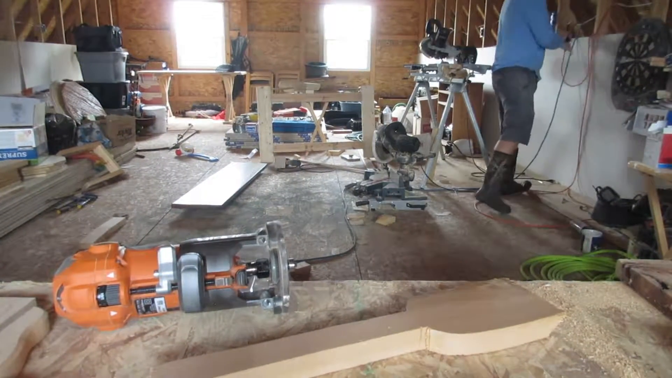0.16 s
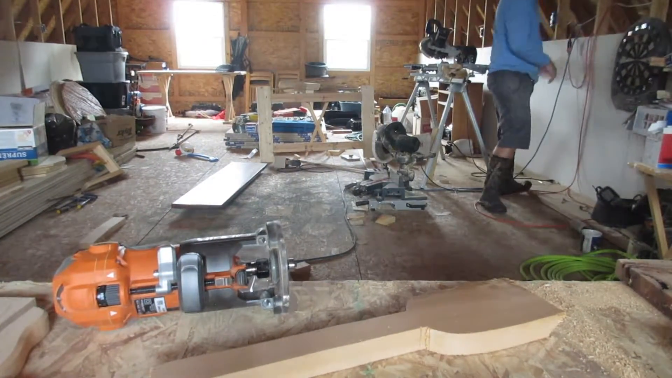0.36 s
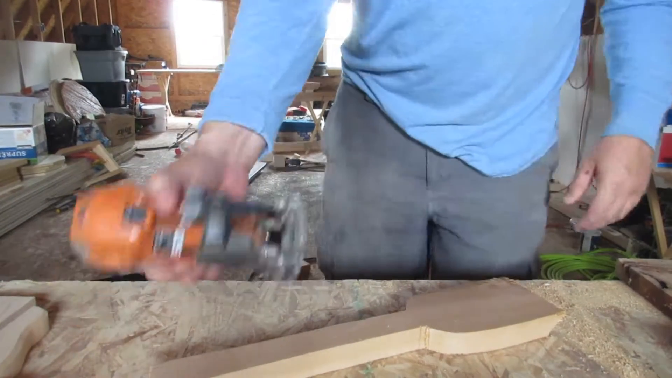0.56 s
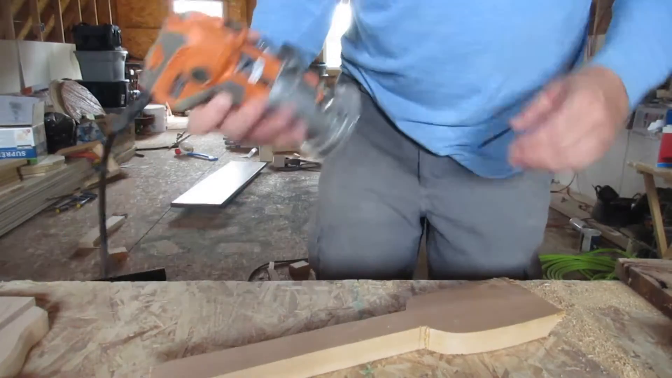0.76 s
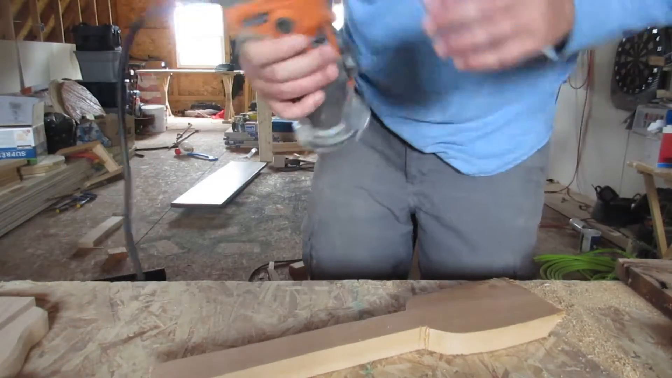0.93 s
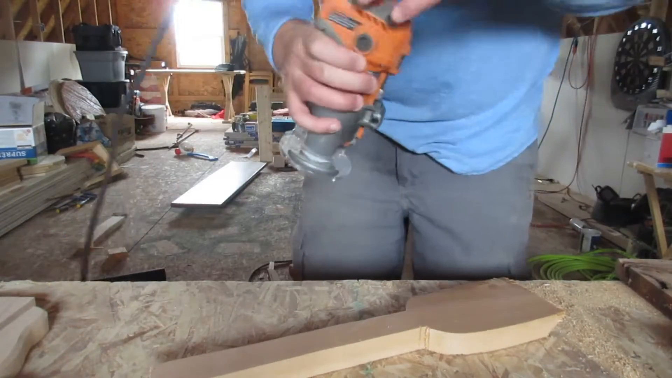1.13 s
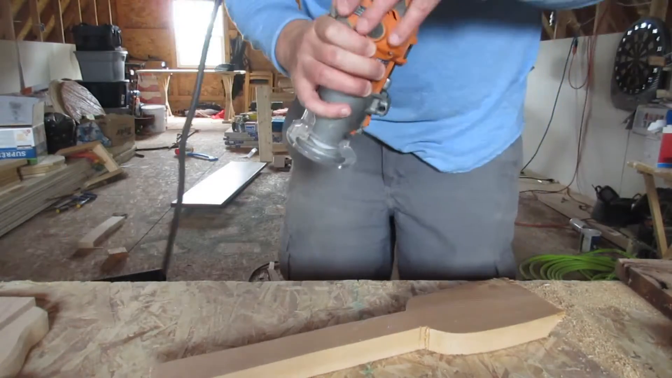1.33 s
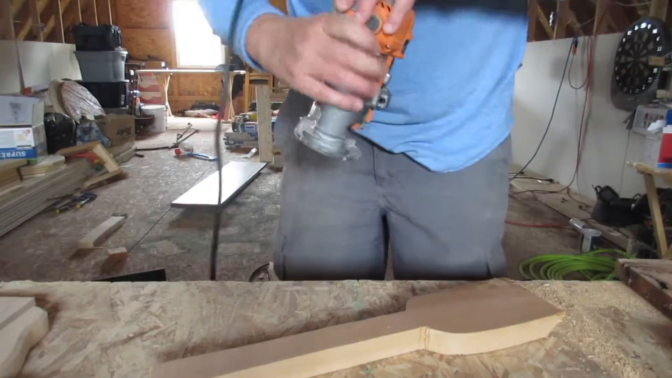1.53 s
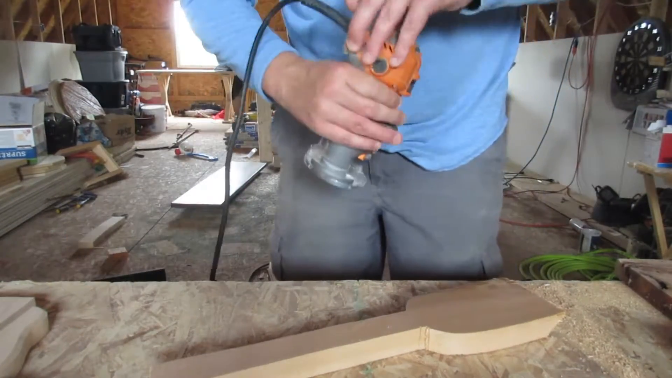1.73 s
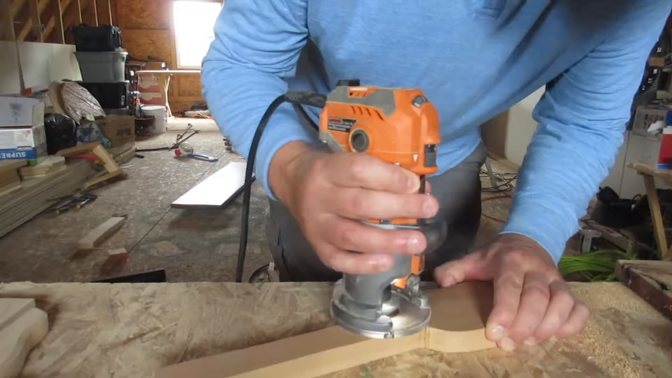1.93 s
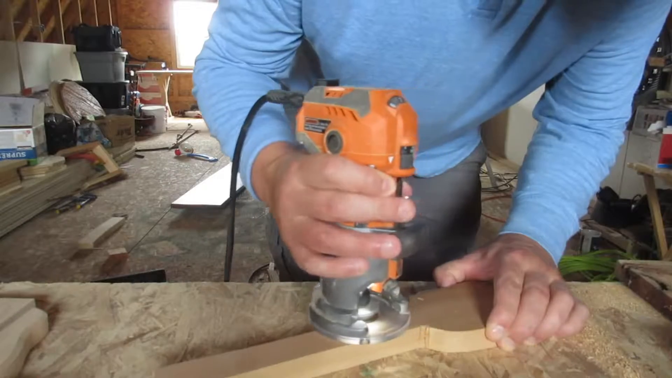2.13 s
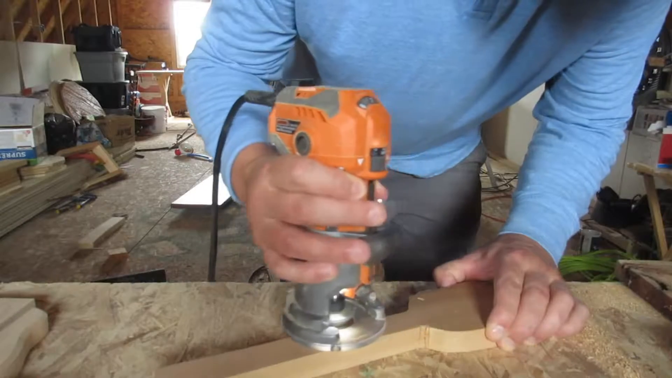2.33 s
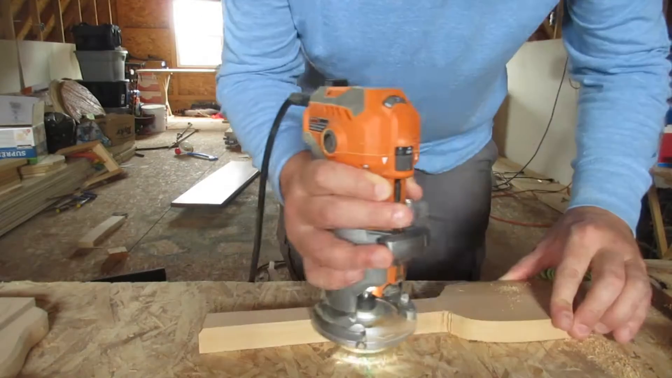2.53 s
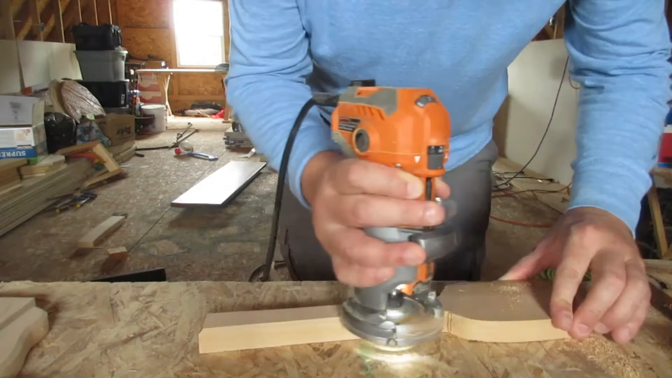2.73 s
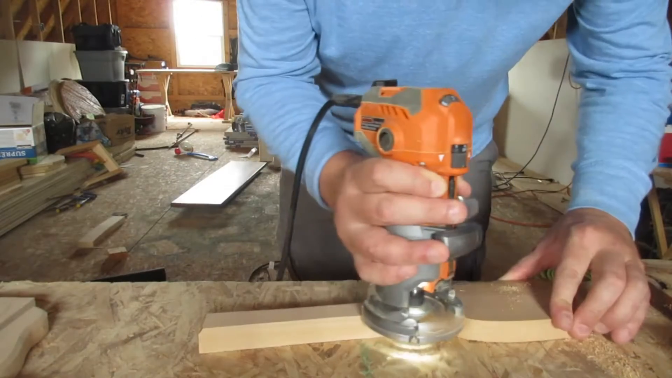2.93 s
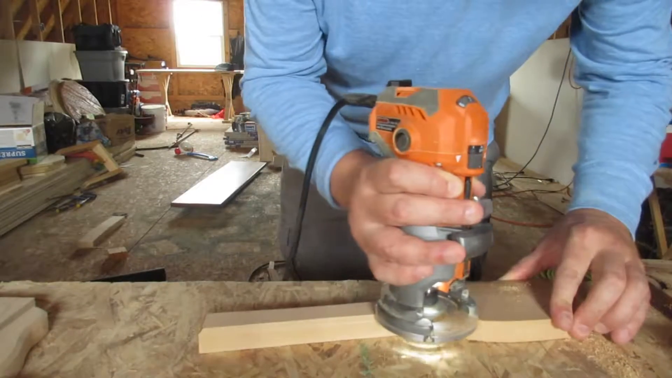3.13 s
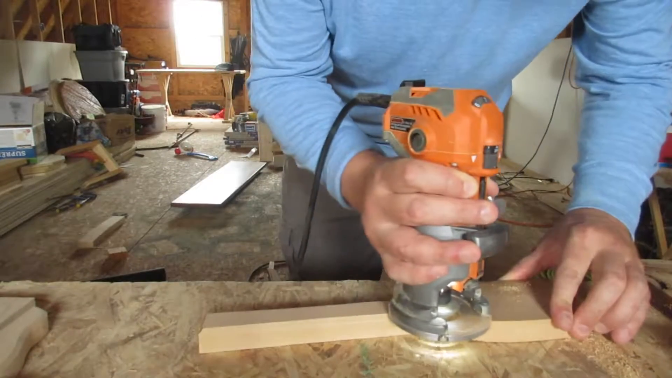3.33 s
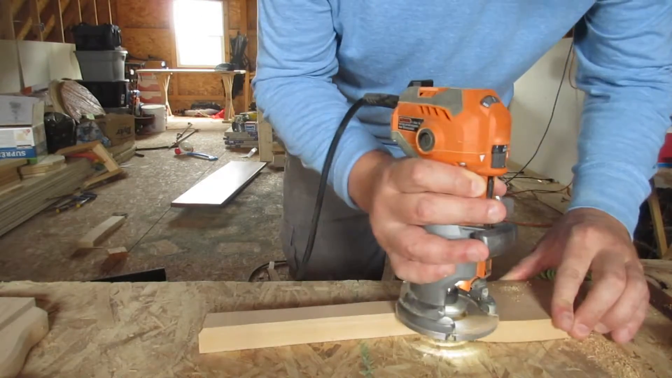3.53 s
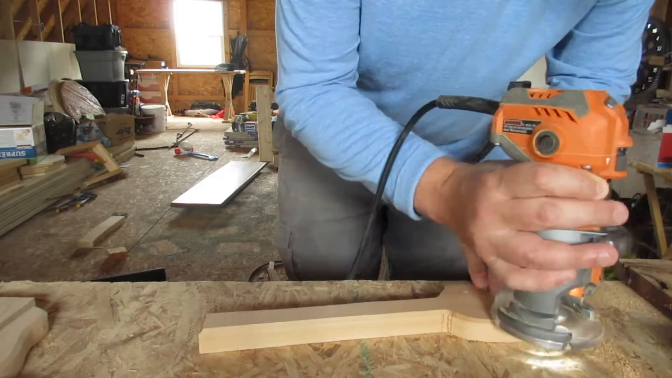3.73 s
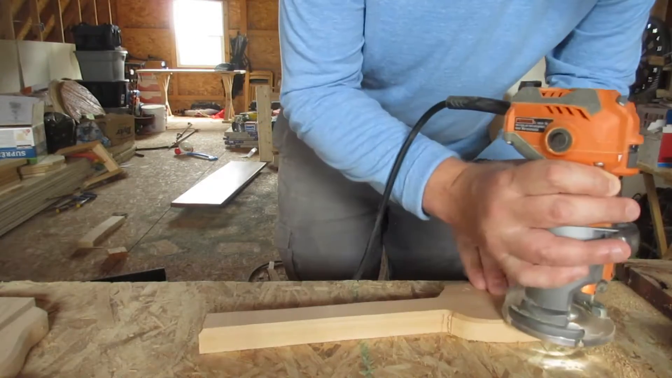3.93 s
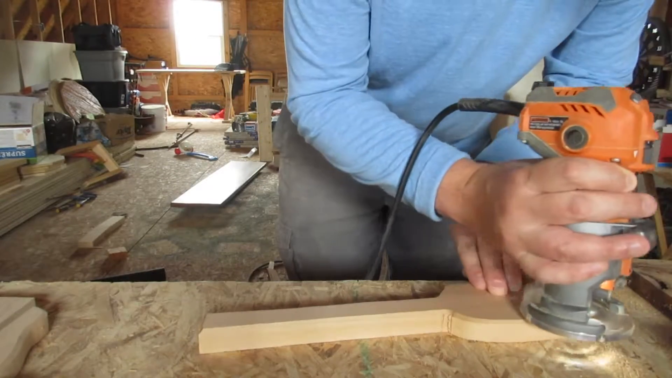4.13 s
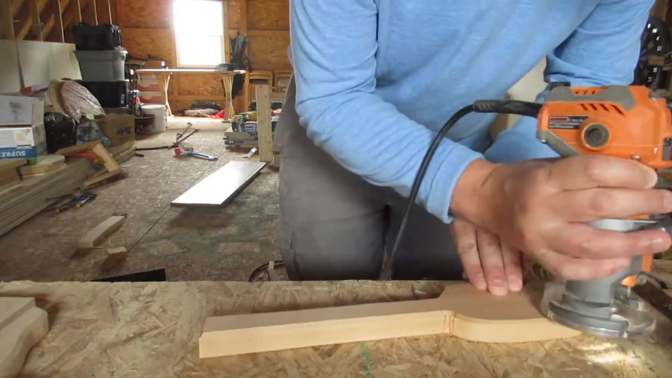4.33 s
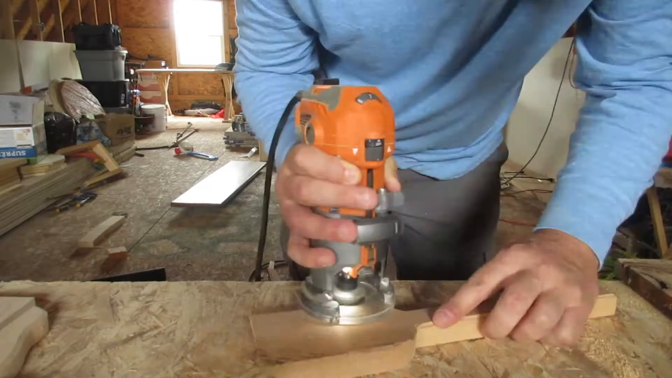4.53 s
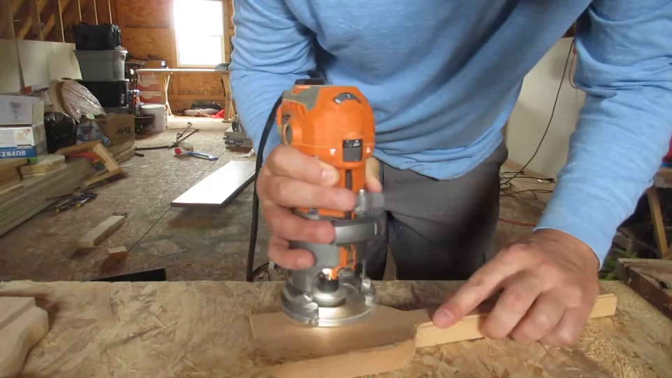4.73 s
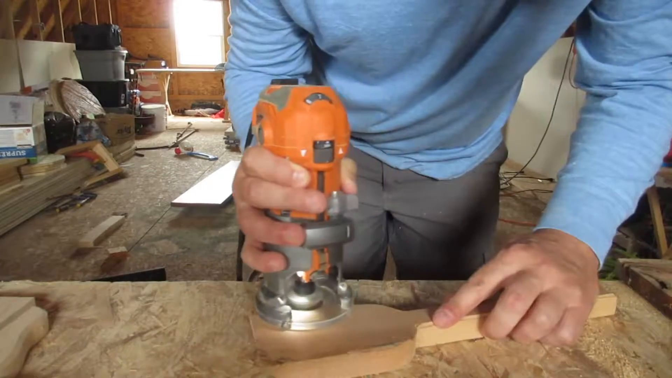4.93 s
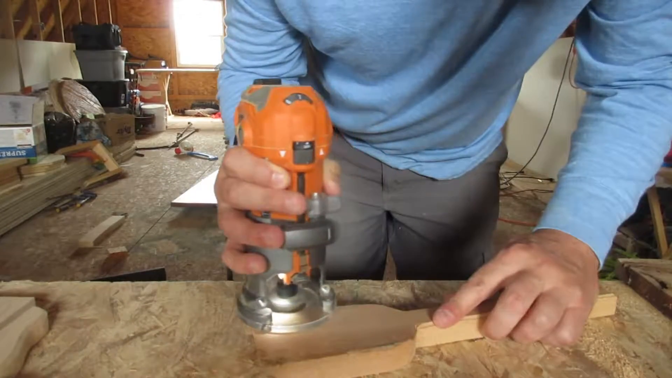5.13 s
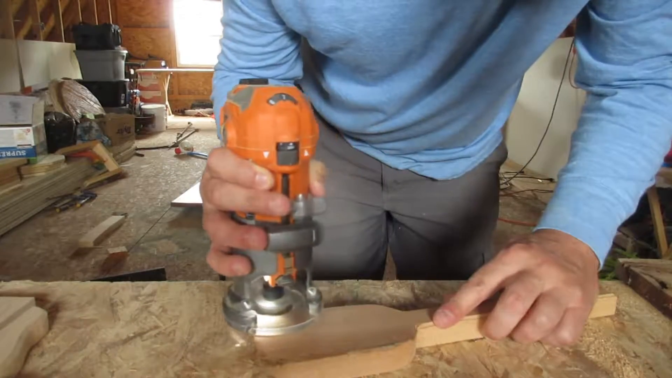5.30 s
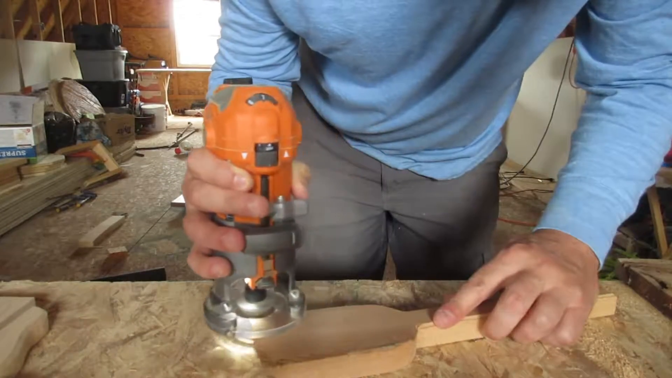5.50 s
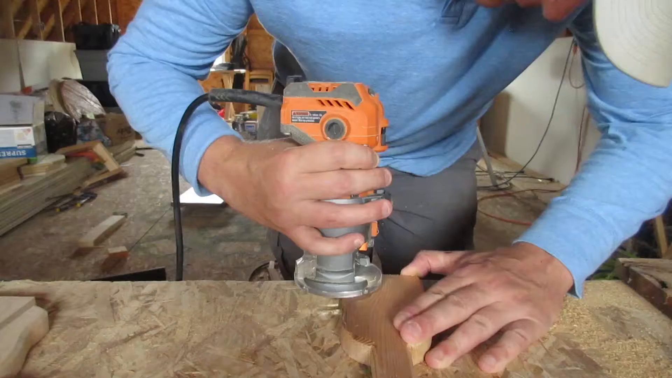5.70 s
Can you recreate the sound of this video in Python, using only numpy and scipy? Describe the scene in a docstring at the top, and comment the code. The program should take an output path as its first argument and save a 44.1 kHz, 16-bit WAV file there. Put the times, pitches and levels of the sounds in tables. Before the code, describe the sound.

In a wooden workshop, two dull timber thuds and two sharper knocks sound in the background, then cord and sleeves scuff as a trim router is lifted. Its switch snaps, the motor buzzes briefly and jumps to a high, loud whine with rasping chips and airy hiss. Four abruptly joined cutting passes follow, with a small squeak near the end of the third, then free spinning. Close mono microphone.

```python
"""Timber thuds across a wooden workshop, as ringing modes and dull noise, between sharp knocks of noise on
wood. Cord and sleeves scuff as a trim router is picked up; its switch snaps on as short rings and noise bursts.
The motor buzzes in mains kicks, then whines at about 27000 rpm as a stack of shaft-speed multiples. Its two-
flute bit shaves a board in four passes, and the sound jumps abruptly from one to the next, with shaped noise
for chips, fan air and brush hiss. A brief squeak sounds late in the third pass, and at last the bit spins
freely. The sound is mono."""
import sys
import numpy as np
from scipy import signal
from scipy.fft import rfft, irfft, next_fast_len
from scipy.io import wavfile
from scipy.ndimage import uniform_filter1d, map_coordinates

SR = 44100
rng = np.random.default_rng(int(sys.argv[2]) if len(sys.argv) > 2 else 0)


def master(y):
    """Save y as 16-bit WAV."""
    cut = np.clip(np.atleast_2d(y).T, -1, 1)
    pcm = np.round(cut * 32767)  # scale
    wavfile.write(sys.argv[1], SR, pcm.astype(np.int16))


N = 258426
TIME = np.arange(N) / SR

# Spectra have columns f/Hz, relative level/dB per Hz.
# Quiet of the shop
SHOP_SPECTRUM = [(15, -39), (25, -20), (139, 7), (278, -1.5), (344, -2.5), (978, -5), (1120, 0.5),
                 (1350, -8.5), (1500, -1), (1810, -13), (7280, -18.5), (10600, -24), (15000, -36)]
# Dull reverberation of the timber thuds
THUD_SPECTRUM = [(25, -27), (80, -10), (120, -2), (170, -4), (220, -4.5), (290, -8), (375, -3.5),
                 (500, -16), (650, -12), (900, -21.5), (1500, -30), (3000, -60)]
# Sharp knock on wood
KNOCK_SPECTRUM = [(150, -5), (600, -9.5), (800, -10), (1000, -2.5), (1600, -7.5), (2400, -4), (3200, -3),
                  (3800, -9), (5300, -17), (7000, -32), (10000, -55), (14000, -65)]
# Low rumble of handling the tool
HANDLING_SPECTRUM = [(15, -46), (25, -7.5), (180, 1.5), (248, -6), (449, -8), (617, -14), (732, -10),
                     (985, -15.5), (1350, -19), (4000, -29.5), (5200, -61), (8800, -120)]
# Swish of cord and sleeves
SLEEVE_SPECTRUM = [(800, -16), (2000, 3), (5000, 1), (9000, -0.5), (12000, -6), (15000, -14)]
# Snap of the plastic switch
CRACK_SPECTRUM = [(150, -31), (450, -23), (800, 4.5), (1700, 7), (3000, 0), (6500, -0.5), (8000, -11),
                  (10000, -6), (15000, -27)]
# Broad answer of the room to the switch
SWITCH_ECHO_SPECTRUM = [(200, -25), (600, -5), (1000, 3), (2000, 1), (3200, -6), (6000, -7), (8000, -18),
                        (15000, -28)]
# Wood chips torn off by the flutes
CHIP_SPECTRUM = [(25, -52), (60, -51), (100, -35), (170, -27), (300, -23.5), (550, -14.5), (750, -8.5),
                 (950, 1.5), (1400, 3), (2000, 0.5), (2300, -3.5), (2600, -16), (3500, -40)]
# Rush of fan air
FAN_SPECTRUM = [(1700, -55), (2450, -3.5), (2800, -2), (3120, 0), (3500, -1), (3900, -1.5), (5400, 0),
                (6200, -1.5), (7200, -4), (8500, -20.5), (11000, -27)]
# Hiss of the motor brushes
BRUSH_SPECTRUM = [(5000, -24), (7200, -0.5), (8200, 4), (9100, 1), (10500, 0), (12000, -2.5), (13500, -8),
                  (14800, -19)]

# Reverberation of the workshop: f/Hz, t60/s
ROOM_DECAY = [(150, 0.64), (1500, 0.32), (6000, 0.23), (14000, 0.1)]
# Timber set down across the shop: t/s, level/dB, t60/s of the dull tail
TIMBER_THUDS = [(0.0, -25.5, 0.48), (0.311, -21, 0.54)]
# Modes of the timber: f/Hz, level/dB, t60/s
TIMBER_MODES = [(171.8, -3.5, 0.46), (305, -10, 0.17), (373, -9, 0.14), (640, -8, .15)]
# Sharp wooden knocks: t/s, level/dB, t60/s, length/s, f/Hz above which the knock is dulled
WOOD_KNOCKS = [(0.208, -37.5, 0.41, 0.17, 1940), (0.454, -23.5, 0.59, 0.11, 9100)]
# Brief ring of the louder knock: t/s, level/dB, f/Hz, t60/s
KNOCK_RING = [(0.464, -15, 3080, .04)]
# Scuffs of cord and sleeves: middle t/s, half-width/s, rumble level/dB, swish level/dB
SCUFFS = [(.6, 0.035, -40, -53.5), (0.656, 0.11, -49, -53.5), (0.8, .07, -54, -54.5),
          (0.949, .11, -37.5, -50), (1.126, 0.15, -41, -49.5), (1.34, 0.021, -62, -51),
          (1.444, 0.095, -58, -55.5), (1.596, 0.12, -66, -53), (1.723, 0.068, -63, -56.5)]
# Contacts of the switch: t/s, level/dB, ring f/Hz, t60/s
SWITCH_CONTACTS = [(1.77, -32, 1500, 0.017), (1.789, -14.5, 4870, 0.014), (1.7923, -4.5, 3260, 0.0044),
                   (1.7939, -3.5, 1520, 0.0073)]

# Levels of each pass; in the last row the bit spins freely. Drifting levels hold at mid-pass. start t/s, shaft
# hum level/dB, flute tone level/dB, whine offset/dB, whine drift/(dB/s), chips level/dB, chips drift/(dB/s),
# fan air level/dB, brush hiss level/dB, hiss drift/(dB/s)
PASSES = [(1.95, -37, -27, 1, 4, -22.5, 2.5, -24.5, -27.5, 3),
          (2.625, -43.5, -22, -2.5, -2.5, -20.5, 2.3, -23.9, -27.5, 0.5),
          (3.79, -35, -43, -11, -9, -21, 2.5, -23, -30.6, -3),
          (4.692, -44.5, -32, -0.5, 3.5, -24.5, -1.5, -23, -27.5, 0),
          (5.767, -45, -42, -21, 0, -25.5, 6, -27.5, -31, -5)]
# The motor sags as the bit bites and recovers as it eases, one curve per pass: t/s, speed/(shaft turns/s)
PASS_SPEEDS = [
    [(1.955, 456.3), (2.172, 453.6), (2.326, 450.6), (2.62, 447.1)],
    [(2.63, 454.6), (2.797, 454), (2.949, 453), (3.6, 450), (3.63, 454.2), (3.785, 456.4)],
    [(3.795, 460.3), (4.057, 460.3), (4.195, 462.8), (4.688, 467.8)],
    [(4.696, 465.5), (5.016, 462.2), (5.44, 455.8), (5.8, 460)],
]
# Even orders of flutes, fan blades and commutator:
# shaft order (rounded in use), level/dB, share of the pass's whine offset that it follows
WHINE_ORDERS = [(4, -23.5, 0.88), (6.03, -30.5, 0.54), (8.04, -32, 0.99), (10, -34, 0.038),
                (12, -29.5, 0.041), (14, -40, .2), (16, -36, 0.53), (18, -39, 0.24), (20, -38.5, .4),
                (22, -39, 0.51), (24, -40.5, .3), (26.2, -44, .1), (28, -47, .1), (30, -44, 0.82),
                (32, -46.5, 0.65)]
# Odd orders, which grow with the depth of the cut: shaft order, level/dB relative to the chips
CHATTER_ORDERS = [(3, -13), (5, -11.5), (7, -17), (9, -18.5), (11, -18.5)]
# Single tones that ring out as the tool passes a favourable spot:
# middle t/s, length/s, shaft order, level/dB at the middle
FLARES = [(2.273, 1, 6, -23.5), (2.364, 0.44, 18, -26), (2.49, 0.35, 8, -25.5), (2.53, 0.17, 12, -22),
          (2.7, 0.29, 12, -27.5), (2.89, .16, 10, -30), (3.175, 0.23, 12, -24), (3.644, 0.099, 6, -26.5),
          (3.863, .22, 20, -26.5), (4.03, 0.73, 6, -24.5), (4.15, .9, 10, -30.5), (4.38, .6, 12, -29),
          (4.74, .24, 26, -36), (4.86, 0.5, 8, -23.5), (4.884, 0.48, 12, -24), (4.979, 0.15, 10, -22),
          (5.331, 0.45, 2, -28.5), (5.362, 0.79, 10, -27.5), (5.398, .36, 12, -24.5),
          (5.417, 0.78, 6, -23.5), (5.686, 0.13, 2, -27.5), (5.5, .66, 8, -29), (5.71, .13, 8, -26),
          (5.736, 0.097, 10, -18.5)]
# Swells of the rush as the tool is pushed on or turned:
# middle t/s, half-width/s, chips rise/dB, fan air rise/dB, brush hiss rise/dB
SURGES = [(2.54, 0.092, 0, 2, .5), (3.23, 0.33, 1.5, 1, 1), (4.46, 0.23, 0, 1.5, 2),
          (5.45, 0.26, 0.5, 0, 2), (5.644, .07, 3.5, 3, 1.5)]

STARTS = [row[0] for row in PASSES]
PASS_NOW = np.searchsorted(STARTS[1:], TIME)  # which pass is under way at each sample

RUMBLE_DB, RUMBLE_FADE_DB_PER_S = -39.5, 12.5  # low rumble under the scuffs
PASS_CHANGE_S = 0.004  # the sound jumps from one pass to the next this quickly
FLARE_EDGE_DB = 8  # a flare is this much weaker at its ends
BLUR_PER_ORDER = 0.018  # strength of the shifting reflections beside the direct tone, per shaft order
SQUEAK_S = 4.565
TOP_HZ = 15150  # band limit of the output


def amp(db):
    """Decibels to gain."""
    return 10 ** (np.asarray(db) / 20)


def unit(x):
    """Scale to rms 1."""
    return x / np.sqrt(np.mean(x ** 2) + 1e-20)


def along(points, hz):
    """Read (f/Hz, value) points on a log frequency axis."""
    f, v = np.transpose(points)
    return np.interp(np.log(hz + 1), np.log(f + 1), v)


def curves(rows):
    """One value per sample for each column after the time."""
    s, *cols = np.transpose(rows)
    return [np.interp(TIME, s, c) for c in cols]


def wobble(rate):
    """A smooth random curve, rate knots a second."""
    knots = rng.standard_normal(int(N * rate / SR) + 4)
    return map_coordinates(knots, [TIME * rate], order=2)


def ramp(start, length):
    """Rises from 0 to 1, beginning at start."""
    return np.clip((TIME - start) / length, 0, 1)


def swell(middle, half_width):
    """A bell-shaped rise and fall, peaking at 1."""
    return np.exp(-2 * ((TIME - middle) / half_width) ** 2)


def decay(start, t60):
    """Envelope of a blow that dies away."""
    return (TIME >= start) * amp(-60 * np.maximum(TIME - start, 0) / t60)


def soften(x):
    """Round off the steps between passes."""
    return uniform_filter1d(x, int(PASS_CHANGE_S * SR), axis=-1)


def filtered(x, response):
    """Shape x by a complex response of frequency."""
    m = next_fast_len(N + SR // 4)
    return irfft(rfft(x, m) * response(np.fft.rfftfreq(m, 1 / SR)), m)[:N]


def coloured(x, spectrum):
    """Shape x by the given spectrum, at rms 1."""
    return unit(filtered(x, lambda hz: amp(along(spectrum, hz))))


def noise(spectrum):
    """Coloured noise of rms 1."""
    return coloured(rng.standard_normal(N), spectrum)


def resonance(hz, centre_hz, width_hz):
    """Causal response of one damped mode."""
    return 1j * hz * width_hz / (centre_hz ** 2 - hz ** 2 + 1j * hz * width_hz)


def room(x):
    """The workshop's answer is a noise tail whose treble dies first."""
    hz, t, z = signal.stft(rng.standard_normal(SR // 2), SR, nperseg=256)
    fading = z * amp(-60 * t / along(ROOM_DECAY, hz)[:, None])
    tail = signal.istft(fading, SR, nperseg=256)[1]
    return signal.fftconvolve(x, tail / np.linalg.norm(tail))[:N]


def shop_quiet(level_db, drop_db):
    """Steady coloured noise of the shop, lower from the first pass on."""
    return amp(level_db) * noise(SHOP_SPECTRUM) * amp(drop_db * ramp(STARTS[0], 0.01))


def thuds(echo_db):
    """Timber is set down across the shop: a few low modes in a dull reverberation."""
    out = np.zeros(N)
    for s, db, t60 in TIMBER_THUDS:
        modes = np.zeros(N)
        for hz, level, life in TIMBER_MODES:
            modes += amp(level) * decay(s, life) * np.sin(2 * np.pi * hz * (TIME - s))
        echo = amp(echo_db) * decay(s, t60) * noise(THUD_SPECTRUM)
        out += amp(db) * ramp(s, 0.001) * (modes + echo)
    return out


def knocks(attack):
    """Sharp blows excite wood as decaying noise: a hard attack, a short rough wash and a brief ring."""
    out = np.zeros(N)
    for s, db, t60, length, dull_hz in WOOD_KNOCKS:
        wood = unit(filtered(noise(KNOCK_SPECTRUM), lambda hz: 1 / (1 + (hz / dull_hz) ** 2)))
        strike = (decay(s, t60) + attack * decay(s, 0.0087)) * ramp(s, 0.00049)
        out += amp(db) * wood * strike * (1 - ramp(s + length - 0.015, 0.018))
    for s, db, hz, t60 in KNOCK_RING:
        out += amp(db) * decay(s, t60) * ramp(s, 0.00044) * np.sin(2 * np.pi * hz * TIME)
    return out


def pickup():
    """Cord and sleeves rub in uneven scuffs as the tool is lifted and turned upright, over a fading rumble."""
    rumble = amp(RUMBLE_DB - RUMBLE_FADE_DB_PER_S * TIME)
    swish = np.zeros(N)
    for s, half_width, rumble_db, swish_db in SCUFFS:
        stroke = swell(s, half_width)
        rumble = np.hypot(rumble, amp(rumble_db) * stroke)
        swish = np.hypot(swish, amp(swish_db) * stroke)
    uneven = amp(1.3 * wobble(30.1) + 1.7 * wobble(99))
    handling = rumble * noise(HANDLING_SPECTRUM)
    sleeves = swish * uneven * noise(SLEEVE_SPECTRUM)
    return (handling + sleeves) * (1 - ramp(1.9, 0.17))


def switch(crack_db, echo_db):
    """The plastic switch ticks, trips and snaps home; each contact rings for a few cycles."""
    rings, blows = np.zeros(N), np.zeros(N)
    for s, db, ring_hz, t60 in SWITCH_CONTACTS:
        blow = amp(db) * decay(s, t60)
        rings += blow * np.sin(2 * np.pi * ring_hz * (TIME - s))
        blows += blow
    crack = filtered(blows * rng.standard_normal(N), lambda hz: amp(along(CRACK_SPECTRUM, hz)))
    thin_rings = filtered(rings, lambda hz: 1j * hz / (350 + 1j * hz))  # small parts radiate little bass
    # the room gathers the snap from all directions, so its answer is broad and toneless
    snap = 1.0 * (np.arange(N) == round(SWITCH_CONTACTS[-1][0] * SR))
    echo = filtered(room(snap), lambda hz: amp(along(SWITCH_ECHO_SPECTRUM, hz)))
    return thin_rings + amp(crack_db) * crack + amp(echo_db) * echo


def soft_start(buzz_db):
    """Each mains half-wave kicks the motor, which rings as it begins to turn."""
    half_wave = (TIME * 120) % 1  # 120 half-waves a second
    kicks = np.exp(-2.5 * half_wave) * rng.standard_normal(N)

    def housing(hz):
        """Three broad modes of the motor housing."""
        return resonance(hz, 2360, 550) - 0.51 * resonance(hz, 770, 1050) - 0.2 * resonance(hz, 4900, 2700)

    buzz = filtered(kicks, housing)
    in_room = unit(buzz + 0.69 * room(buzz))
    return amp(buzz_db) * in_room * ramp(1.832, 0.083) * (1 - ramp(STARTS[0], 0.01))


def bench(drone_db, centre_hz):
    """Pressed down hard in the second pass, the tool shakes the bench top: noise through two modes."""
    def modes(hz):
        """A narrow main mode and a weaker low one."""
        return resonance(hz, centre_hz, 6.1) + 0.14 * resonance(hz, 78, 25)

    top = unit(filtered(rng.standard_normal(N), modes))
    pressed = ramp(STARTS[1], 0.05) * (1 - ramp(3.35, 0.3))
    return amp(drone_db) * top * pressed


def squeak(s, db):
    """A brief two-tone squeak near the end of the third pass."""
    pair = np.sin(2 * np.pi * 7560 * TIME) + 1.35 * np.sin(2 * np.pi * 4715 * TIME)
    return amp(db) * pair * np.exp(-((TIME - s) / 0.0066) ** 2)


def pass_levels():
    """Sets the levels of each pass: hum, flute tone, whine, chips, fan air and hiss (dB per sample)."""
    edges = np.append(STARTS, N / SR)
    since_middle = TIME - (edges[PASS_NOW] + edges[PASS_NOW + 1]) / 2
    (_, hum, flute, tones, tones_drift, chips, chips_drift,
     air, hiss, hiss_drift) = np.array(PASSES)[PASS_NOW].T
    tones = tones + tones_drift * since_middle
    chips = chips + chips_drift * since_middle
    hiss = hiss + hiss_drift * since_middle
    return soften(np.array([hum, flute, tones, chips, air, hiss]))


def ease_off(length, drop_db):
    """The third and fourth passes end with the bit running off the wood, so the rush thins out."""
    running_off = sum(ramp(end - length, length) * (TIME <= end) for end in STARTS[-2:])
    return amp(drop_db * running_off)


def shaft_angle(speed, jitter):
    """The shaft turns at a slowly drifting speed with a slight tremor."""
    return 2 * np.pi * np.cumsum(speed * (1 + jitter * wobble(70))) / SR


def tone(angle, multiple, scatter):
    """One shaft order at rms 1; its reflections shift as the tool moves and blur the line."""
    rate = 18 + 2.2 * multiple
    paths = 1 + scatter * (wobble(rate) + 1j * wobble(rate))
    phase = multiple * angle + rng.uniform(0, 2 * np.pi)
    return unit(np.real(paths * np.exp(1j * phase)))


def flares(order):
    """Gain of the moments at which this order stands out; each is held to its own pass."""
    gain = np.zeros(N)
    for s, length, k, db in FLARES:
        if round(k) == order:
            edge = np.minimum(np.abs(2 * (TIME - s) / length), 2) ** 6
            same_pass = PASS_NOW == np.searchsorted(STARTS[1:], s)
            gain = np.hypot(gain, amp(db - FLARE_EDGE_DB * edge) * same_pass)
    return soften(gain)


def rush(angle, chips_db, fan_db, hiss_db, bite):
    """Each flute tears off chips of uneven size; the fan rushes and the brush hiss pulses once a turn."""
    more_chips, more_fan, more_hiss = sum(
        np.outer(rises_db, swell(s, half_width)) for s, half_width, *rises_db in SURGES)
    tearing = (1 + bite * np.cos(2 * angle)) * amp(0.4 * wobble(300))
    chips = coloured(tearing * rng.standard_normal(N), CHIP_SPECTRUM)
    chips = amp(chips_db + more_chips + 0.59 * wobble(25)) * chips
    fan = amp(fan_db + more_fan + 0.59 * wobble(200)) * noise(FAN_SPECTRUM)
    hiss = amp(hiss_db + more_hiss + 0.99 * wobble(200)) * noise(BRUSH_SPECTRUM)
    return chips + fan + hiss * (1 + 0.22 * np.cos(angle))


def chatter(angle, chips_db, fade_db):
    """The two flutes bite unequally, which adds blurred odd orders."""
    out = np.zeros(N)
    for k, db in CHATTER_ORDERS:
        out += amp(chips_db + db + fade_db * wobble(4.88)) * tone(angle, round(k), scatter=0.43)
    return out


def whine(angle, hum_db, flute_db, whine_db, fade_db):
    """Unbalance, flutes, fan blades and commutator sound shaft orders; high ones fade in and out the most."""
    out = amp(hum_db + 1.6 * wobble(7)) * tone(angle, 1, scatter=0.057)
    flute_gain = np.hypot(amp(flute_db + 1.2 * wobble(8)), flares(order=2))
    out += flute_gain * tone(angle, 2, scatter=0.046)
    for k, db, share in WHINE_ORDERS:
        gain = amp(db + share * whine_db + fade_db * np.sqrt(k) * wobble(6))
        gain = np.hypot(gain, flares(round(k)))
        out += gain * tone(angle, round(k), scatter=BLUR_PER_ORDER * k)
    return out


def router():
    """The running tool: shaft tones and cutting noise; its sound dips briefly in the second pass."""
    speed, = curves(np.vstack(PASS_SPEEDS))
    hum_db, flute_db, whine_db, chips_db, fan_db, hiss_db = pass_levels()
    angle = shaft_angle(speed, jitter=0.00024)
    running = whine(angle, hum_db, flute_db, whine_db, fade_db=0.75)
    running = running + chatter(angle, chips_db, fade_db=-1.5)
    running = running + rush(angle, chips_db, fan_db, hiss_db, bite=0.44) * ease_off(length=0.12, drop_db=-3.5)
    running = running + bench(drone_db=-56.5, centre_hz=179.6) + squeak(SQUEAK_S, db=-23.0)
    dip = np.clip(np.abs(TIME - 3.389) / 0.015, 0, 1)
    return running * ramp(STARTS[0] - 0.002, 0.01) * dip


def scene():
    """All sources over the quiet of the shop, alike in both channels."""
    shop = shop_quiet(level_db=-50.5, drop_db=-9)
    before = thuds(echo_db=-3) + knocks(attack=1.2) + pickup()
    tool = switch(crack_db=0.0, echo_db=7.5) + soft_start(buzz_db=-35.5) + router()
    mono = shop + before + tool
    return np.array([mono, mono])


def record(dry):
    """Clip at full scale, then remove everything from the band limit up."""
    return np.array([filtered(np.clip(ch, -1, 1), lambda hz: hz < TOP_HZ) for ch in dry])


dry = scene()
out = record(dry)
master(out)
```